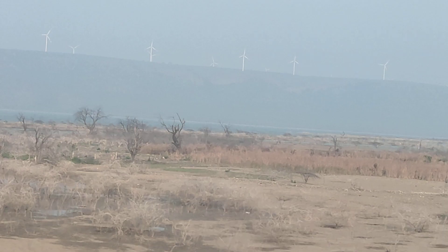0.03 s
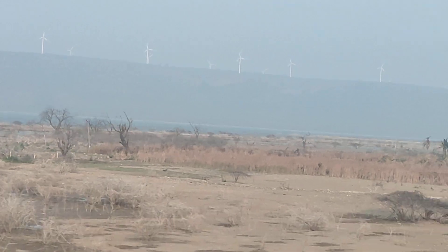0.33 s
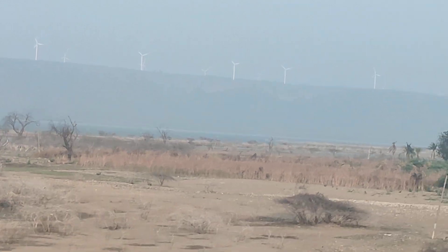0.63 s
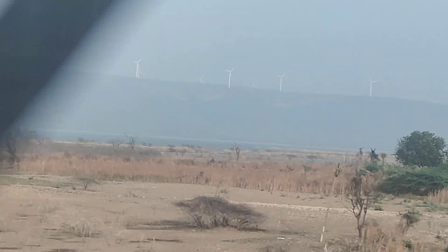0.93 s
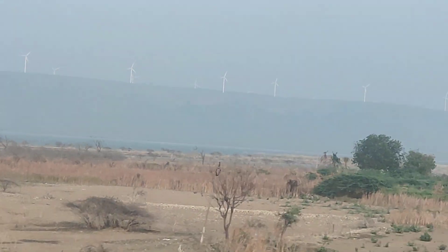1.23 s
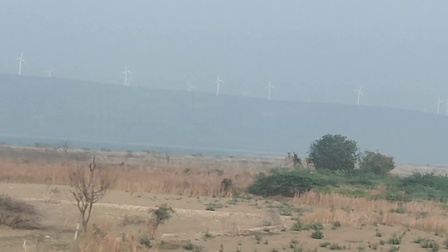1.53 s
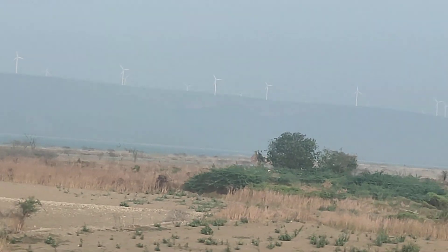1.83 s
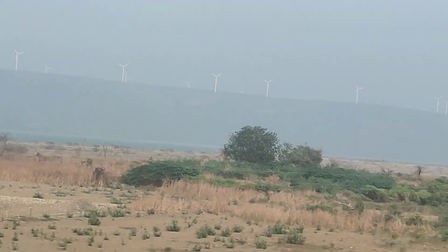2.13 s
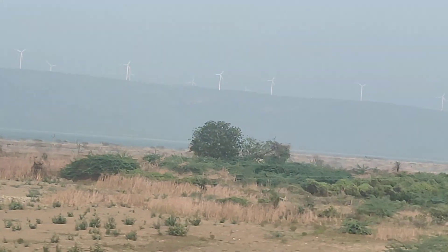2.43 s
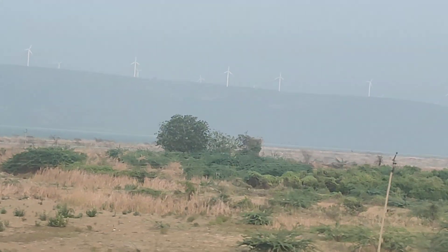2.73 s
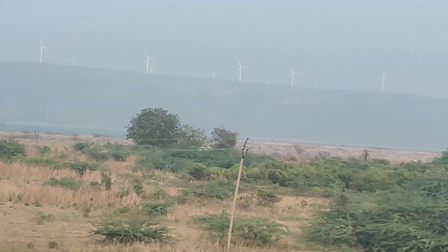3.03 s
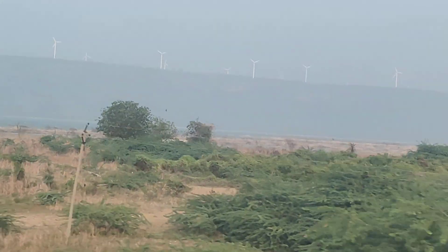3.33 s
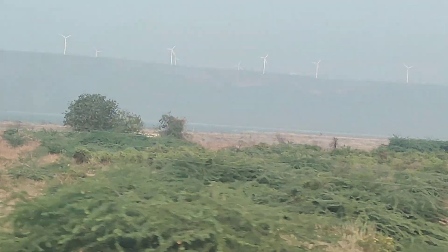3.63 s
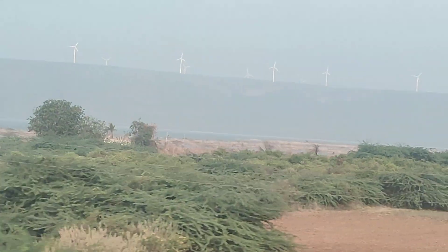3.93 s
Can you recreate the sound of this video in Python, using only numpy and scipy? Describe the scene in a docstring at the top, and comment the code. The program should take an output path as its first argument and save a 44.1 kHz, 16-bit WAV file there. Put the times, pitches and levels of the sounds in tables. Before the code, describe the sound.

A diesel engine drones over a low rumble for all four seconds, heard inside a moving vehicle, with a softer rush of tyres and wind. Bumps lightly rattle the trim around 0.3 to 0.5 seconds and most clearly just after 3. On the right, a small metal fitting ticks now and then, sharpest at 2.3 seconds, and faint brief squeaks come near 1.3, 1.6 and 3.7 seconds.

```python
"""A steady diesel drone and a low rumble, heard inside a vehicle cruising on a dry country road.
The engine's firing makes the drone and shakes the body. Panels hum, and the rush of tyres and wind
swells on rougher stretches. A small loose metal fitting ticks on the right, jolts rattle the cabin
trim, and rubbing parts squeak faintly, also on the right."""
import sys
import numpy as np
from scipy import signal
from scipy.io import wavfile

SR = 44100
rng = np.random.default_rng(int(sys.argv[2]) if len(sys.argv) > 2 else 0)


def file_out(sig):
    """Save sig as 16-bit WAV at sys.argv[1]."""
    # one column per channel
    cols = np.atleast_2d(sig).T
    # limit, then scale
    lim = np.clip(cols, -1, 1)
    pcm = np.round(lim * 32767).astype(np.int16)
    wavfile.write(sys.argv[1], SR, pcm)


N = 176400
TIME = np.arange(N) / SR


def from_db(db):
    """Turn decibels into a number to multiply a sound by."""
    return 10 ** (np.asarray(db) / 20)


def unit_power(x):
    """Scale a signal so that its average power is 1."""
    return x / np.sqrt(np.mean(x ** 2) + 1e-20)


def over_time(rows):
    """Join (seconds, value) points with straight lines."""
    return np.interp(TIME, *np.transpose(rows))


def at_pitch(rows, hz):
    """Read between (Hz, value) points, with octaves evenly spaced."""
    pitches, values = np.transpose(rows)
    return np.interp(np.log(hz), np.log(pitches), values)


def pan(db):
    """Left and right gains; positive dB leans left."""
    return from_db(np.array([[.5], [-.5]]) * db)


def drift(hz):
    """A smooth random wander of about 1 either way; more Hz makes it quicker."""
    pole = np.exp(-80 * np.pi * hz / SR)
    noise = rng.standard_normal(N // 40 + 2002)
    slow = signal.lfilter([1], [1, -2 * pole, pole * pole], noise)[2000:]
    return np.interp(np.arange(N) / 40, np.arange(len(slow)), unit_power(slow))


# How alike the two ears' noise is. Each row: pitch in Hz, likeness (1 or more same, -1 opposite).
EAR_LIKENESS = [(60, 2.3), (150, 0.7), (300, 1.1), (440, -0.2), (580, 0.44), (750, .5), (1000, -0.34),
                (1250, -0.5), (1700, -0.09), (2300, -0.5), (2800, 0.67), (3600, 0.08), (5000, -0.5)]
# Which way the sound leans. Each row: pitch in Hz, left minus right in dB.
EAR_BALANCE = [(60, 1), (230, -0.3), (360, 3.5), (570, -2), (900, 3), (1400, 0.5), (2200, -3.5), (3500, -2),
               (6000, 6.5), (9000, -8)]
def banded_noise(spectrum, flicker_db, low_hz, bands):
    """Stereo noise in quarter-octave bands that flicker partly together, partly alone."""
    out, shared_flicker = 0, drift(12)
    edges = low_hz * 2 ** (np.arange(bands + 1) / 4)
    white = rng.standard_normal((2, 2, N + SR))
    for k, (low, high) in enumerate(zip(edges, edges[1:])):
        band = signal.butter(3, [low, high], "band", fs=SR, output="sos")
        mid, side = signal.sosfilt(band, white[k % 2])[:, SR:]
        hz = np.sqrt(low * high)
        alike = np.clip(at_pitch(EAR_LIKENESS, hz), -1, 1)
        stereo = np.sqrt(1 + alike) * mid + np.sqrt(1 - alike) * side * [[1], [-1]]
        gain = from_db(at_pitch(spectrum, hz) + flicker_db * (.7 * shared_flicker + drift(15)))
        out = out + gain * pan(at_pitch(EAR_BALANCE, hz)) * stereo
    return unit_power(out)


CYCLE_HZ = 11.69   # full four-stroke engine cycles each second
SHAKE_SHARE = .55   # how closely the rumble and the weaker engine notes follow the shaking
def engine_note(multiple, level_db, waver_db=.5, waver_radians=.13):
    """One wavering tone at a multiple of the engine's cycle rate."""
    hz = multiple * CYCLE_HZ
    phase = 2 * np.pi * (hz * TIME + rng.random()) + waver_radians * drift(1.9)
    gain = np.sqrt(2) * from_db(level_db + waver_db * drift(2.2))
    return gain * np.sin(phase) * pan(at_pitch(EAR_BALANCE, hz))


# The note of the cylinders firing. Each row: time in seconds, level in dB.
FIRING_LEVELS = [(0, -16.5), (.15, -17.5), (.6, -28), (.8, -22), (1.1, -24.5), (1.6, -19.5), (1.86, -21.5),
                 (2.06, -16.5), (2.25, -19.5), (2.75, -21.5), (3.35, -26.5), (4, -18.5)]
# The note that booms in the cabin. Each row: time in seconds, level in dB.
BOOM_LEVELS = [(0, -22), (.22, -18.5), (.4, -16.5), (1.5, -15.5), (1.85, -17), (2.17, -20.5), (2.35, -15.5),
               (3.1, -17), (4, -17.5)]
# The weaker engine notes. Each row: multiple of the cycle rate, level in dB before shaking.
WEAK_NOTES = [(3, -37), (4, -31.5), (8, -35), (11, -37), (12, -32), (13, -35), (15, -34.5), (16, -42),
              (18, -43), (22, -41.5), (24, -49), (34, -54), (37, -53.5)]
def engine(shake_db):
    """Two strong notes carry the drone; weaker ones grow as the road shakes the body."""
    firing = engine_note(6, over_time(FIRING_LEVELS))
    boom = engine_note(9, over_time(BOOM_LEVELS))
    weak = sum(engine_note(multiple, db + SHAKE_SHARE * shake_db, waver_db=2, waver_radians=.35)
               for multiple, db in WEAK_NOTES)
    return firing + boom + weak


# The tone of the rumble. Each row: pitch in Hz, relative level in dB.
RUMBLE_SPECTRUM = [(14, -2), (30, -1.5), (55, -.5), (90, -.5), (125, -1), (160, -10.5), (200, -11),
                   (232, -19), (270, -15), (320, -16), (370, -26.5), (425, -25), (480, -40), (700, -54)]
def body_rumble(shake_db):
    """The vehicle's body rumbles, throbbing once in each engine cycle."""
    throb_db = .94 * np.sin(2 * np.pi * CYCLE_HZ * TIME)
    gain = from_db(-23.9 + SHAKE_SHARE * shake_db + throb_db)
    return gain * banded_noise(RUMBLE_SPECTRUM, flicker_db=2, low_hz=12.95, bands=23)


# Ringing body panels. Each row: pitch in Hz, pitch spread in Hz, level in dB before shaking.
PANEL_NOTES = [(268, 24, -41), (426, 18, -46)]
def panel_hum(shake_db):
    """Panels hum at their own pitches, louder as the road shakes them."""
    out = 0
    for hz, spread_hz, db in PANEL_NOTES:
        phase = 2 * np.pi * hz * TIME
        hum = unit_power(drift(spread_hz) * np.cos(phase) + drift(spread_hz) * np.sin(phase))
        out = out + from_db(db + .8 * shake_db) * hum * pan(at_pitch(EAR_BALANCE, hz))
    return out


# How rough the road is. Each row: time in seconds, relative level of the rush in dB.
ROAD_ROUGHNESS = [(0, -49.5), (.2, -51), (.32, -47.5), (.45, -53), (.6, -55.5), (.76, -53.5), (.85, -54),
                  (1.1, -53), (1.24, -57.5), (1.36, -51), (1.46, -57.5), (1.68, -56.5), (1.88, -55),
                  (2.13, -49.3), (2.31, -51), (2.335, -58.5), (2.74, -55.5), (2.88, -59), (2.99, -54.5),
                  (3.1, -51), (3.22, -51), (3.33, -54), (3.46, -52.5), (3.53, -47), (3.68, -53.5),
                  (3.81, -54), (3.87, -52.5), (4, -51.5)]
# The tone of the rush. Each row: pitch in Hz, relative level in dB.
RUSH_SPECTRUM = [(300, 0), (500, 7), (620, 7.3), (800, 7.2), (1000, 4.6), (1250, -1.2), (1550, 1.8),
                 (2000, -.3), (2500, -2.2), (3000, -9), (3600, -9.5), (4300, -19.5), (5200, -25.5),
                 (6200, -29), (7300, -37), (9000, -26.5), (11500, -39)]
def tyres_and_wind():
    """Tyres and air make a muffled rush that swells on rough road."""
    road_db = over_time(ROAD_ROUGHNESS)
    gain = from_db(-44.5 + road_db - road_db.mean())
    return gain * banded_noise(RUSH_SPECTRUM, flicker_db=1, low_hz=284.4, bands=22)


# Ticks of the loose fitting. Each row: start in seconds, relative strength in dB.
FITTING_TICKS = [(0.084, -52.5), (.183, -61.5), (0.715, -57.5), (1.914, -54), (2.271, -41), (2.285, -51),
                 (2.303, -53), (2.739, -51), (2.940, -57), (3.159, -56), (3.385, -66)]
# How it rings. Each row: pitch in Hz, relative level in dB, seconds to fade by 60 dB.
FITTING_NOTES = [(4850, -9, .012), (6050, -8, .01), (7380, -5, .007), (8300, -5, .007), (9000, -7, .012),
                 (9400, -4, .02), (10850, -7, .018), (11300, -7, .009)]
def fitting_ticks(chatter_per_second=5000, fade_db_per_second=650):
    """Each tick is one hit and a quickly dying chatter that ring the small metal part."""
    hits = np.zeros(N)
    fade = from_db(-9.5 - fade_db_per_second * np.minimum(TIME, .2))
    for start_s, db in FITTING_TICKS:
        start = int(start_s * SR)
        chatter = (rng.random(N) < chatter_per_second / SR) * rng.standard_normal(N) * fade
        chatter[0] = 1   # the first hit
        hits[start:] += from_db(db - 9) * chatter[:N - start]
    hits += 1e-18
    crack = signal.sosfilt(signal.butter(2, 4000, "high", fs=SR, output="sos"), hits)
    out = from_db(8.5) * crack
    for hz, db, fade_s in FITTING_NOTES:
        decay, angle = from_db(-60 / (fade_s * SR)), 2 * np.pi * hz / SR
        ring = signal.lfilter([0, np.sin(angle)], [1, -2 * decay * np.cos(angle), decay ** 2], hits)
        out = out + from_db(db) * ring
    return out


# Jolts from the road. Each row: start in seconds, relative level in dB, seconds to fade by 60 dB.
ROAD_JOLTS = [(.315, -50, .35), (.512, -48, .22), (.755, -55, .3), (1.315, -54, .3), (1.603, -53, .25),
              (2.452, -54, .25), (2.632, -50, .25), (2.708, -52, .25), (3.012, -42.5, .3),
              (3.085, -44.5, .25), (3.155, -44, .45), (3.57, -50, .25), (3.835, -51, .35)]
# The tone of the rattle. Each row: pitch in Hz, relative level in dB.
TRIM_SPECTRUM = [(700, 3), (1200, -1.5), (1900, 1), (2600, 0), (3600, -1.5), (4600, -14), (6500, -23),
                 (9300, -22), (11500, -31)]
def trim_rattle(rise_s=.008, taps_per_second=900, tap_s=.002):
    """Each jolt sets the loose cabin trim rattling in a dying cloud of tiny taps."""
    jolts = 0
    for start_s, db, fade_s in ROAD_JOLTS:
        age = np.maximum(TIME - start_s, 0)
        jolts = jolts + np.minimum(age / rise_s, 1) * from_db(db - 1 - 60 * age / fade_s)
    tap_starts = rng.random(N) < taps_per_second / SR
    strengths = from_db(2.5 * np.minimum(rng.exponential(1, N), 4))
    taps = signal.lfilter([1], [1, -np.exp(-1 / (tap_s * SR))], tap_starts * strengths + 1e-18)
    texture = .5 + .5 * unit_power(taps)   # half smooth, half grainy
    return jolts * texture * banded_noise(TRIM_SPECTRUM, flicker_db=1.5, low_hz=700, bands=16)


# The squeaks. Each row: loudest moment in seconds, pitch in Hz, level in dB.
PART_SQUEAKS = [(1.33, 2020, -52), (1.615, 2100, -52.5), (2.045, 10930, -68), (3.71, 2260, -51)]
def squeaks(fade_s=.022, sag_hz_per_second=2000, rough_radians=1.2):
    """Parts rub together in brief, rough squeaks that sag in pitch."""
    out = 0
    for peak_s, hz, db in PART_SQUEAKS:
        t = TIME - peak_s
        phase = 2 * np.pi * (hz - .5 * sag_hz_per_second * t) * t + rough_radians * drift(90)
        out = out + from_db(db) * np.exp(-(t / fade_s) ** 2) * np.sin(phase)
    return out


# Pitches the cabin air favours. Each row: pitch in Hz, width in Hz, boost in dB.
CABIN_PEAKS = [(570, 50, 1.5), (1570, 70, 3), (1800, 70, 4), (2380, 80, 4), (3245, 90, 3.5), (8900, 300, 4),
               (9470, 200, 2.5)]
def cabin_air(sound):
    """The air in the cabin rings along, lifting a few pitches."""
    out = sound
    for hz, width_hz, db in CABIN_PEAKS:
        ring = signal.lfilter(*signal.iirpeak(hz, hz / width_hz, fs=SR), sound)
        out = out + (from_db(db) - 1) * ring
    return out


# How hard the road shakes the body. Each row: time in seconds, dB above or below the usual.
BODY_SHAKE = [(0, 4), (.35, 3.5), (.58, -1), (.8, 2.5), (1.25, -3), (1.6, -2.5), (1.85, 0), (2.15, 0),
              (2.4, -3), (2.9, -2.5), (3.1, 3), (3.42, 0), (3.6, 2.5), (4, 2.5)]
def scene():
    """Drone, rumble, rush and rattle all around; ticks and squeaks to the right."""
    shake_db = over_time(BODY_SHAKE)
    lows = engine(shake_db) + body_rumble(shake_db) + panel_hum(shake_db)
    rush_and_rattle = cabin_air(tyres_and_wind() + trim_rattle())
    return lows + rush_and_rattle + pan(db=-10) * fitting_ticks() + pan(db=-4) * squeaks()


def record(dry):
    """Cut the highest treble steeply: 70 dB down from 12600 Hz up."""
    return signal.sosfilt(signal.cheby2(14, 70, 12600, fs=SR, output="sos"), dry)


dry = scene()
out = record(dry)
file_out(out)
```